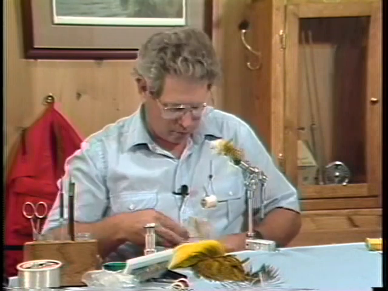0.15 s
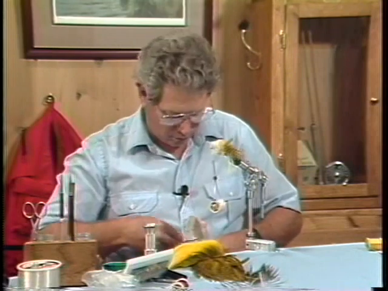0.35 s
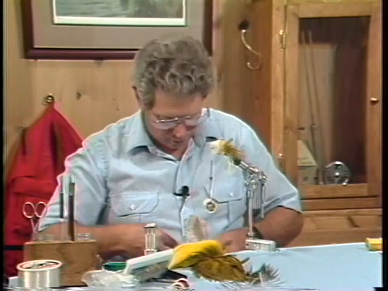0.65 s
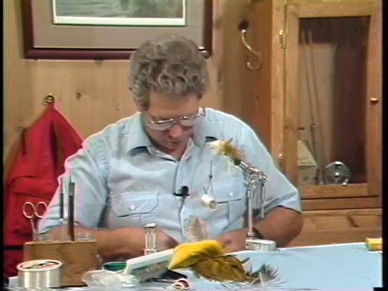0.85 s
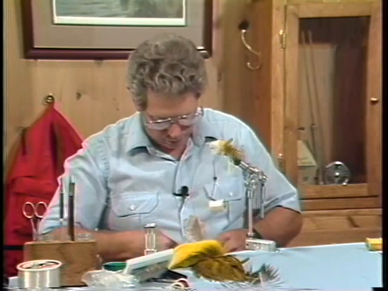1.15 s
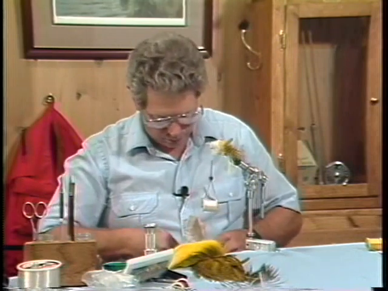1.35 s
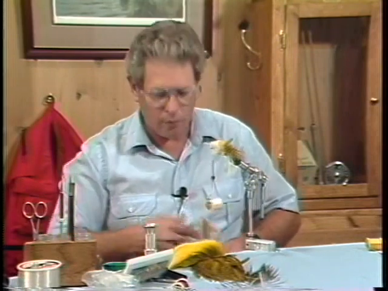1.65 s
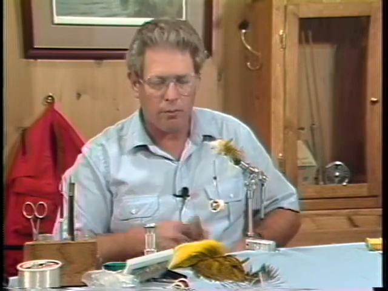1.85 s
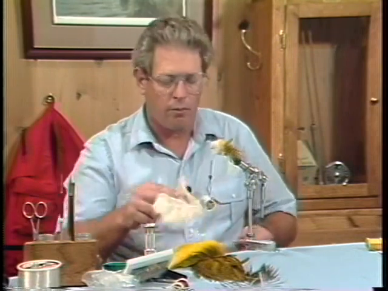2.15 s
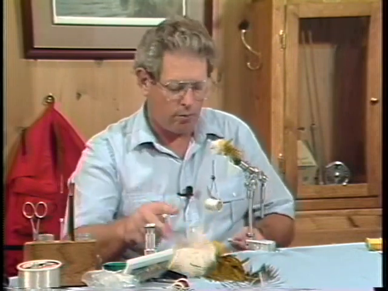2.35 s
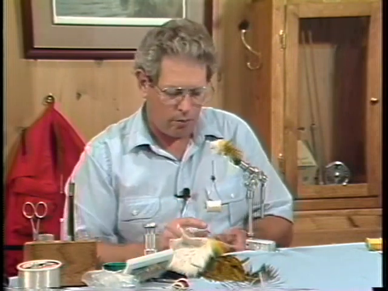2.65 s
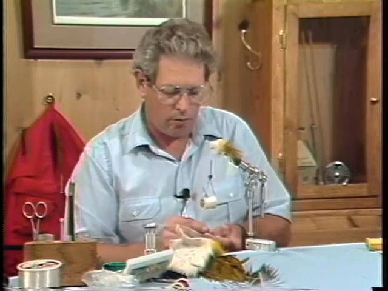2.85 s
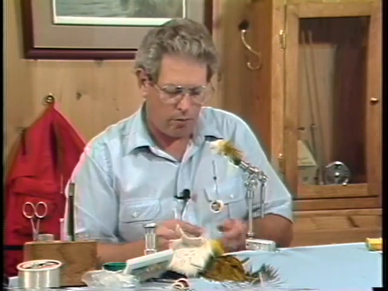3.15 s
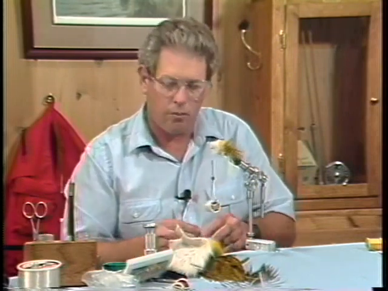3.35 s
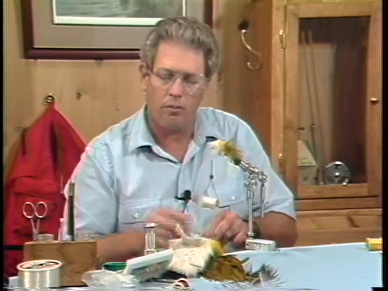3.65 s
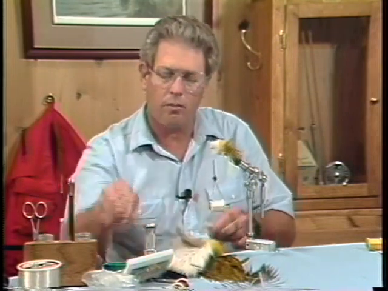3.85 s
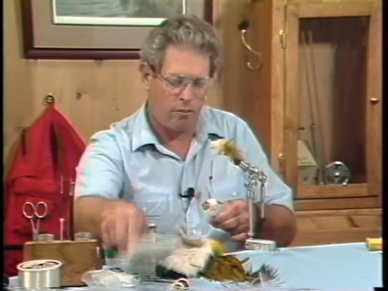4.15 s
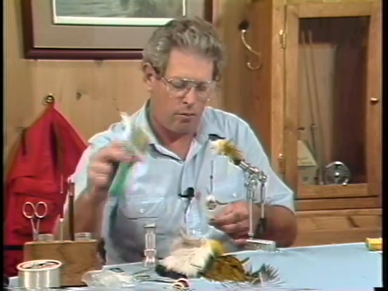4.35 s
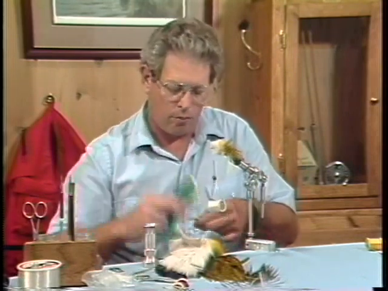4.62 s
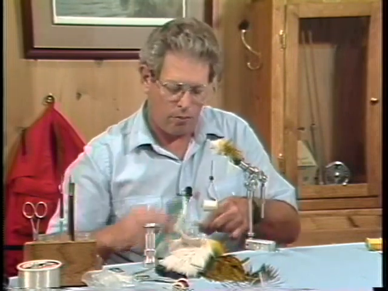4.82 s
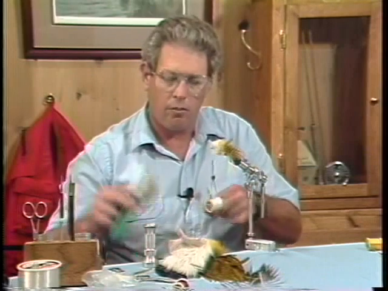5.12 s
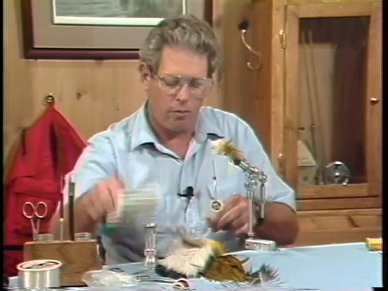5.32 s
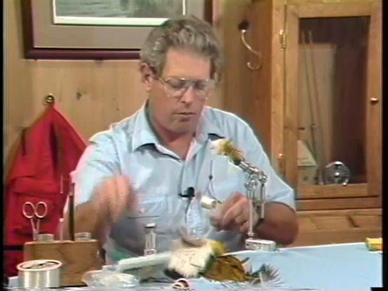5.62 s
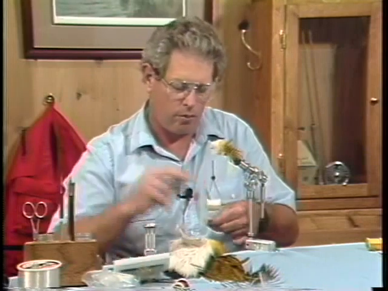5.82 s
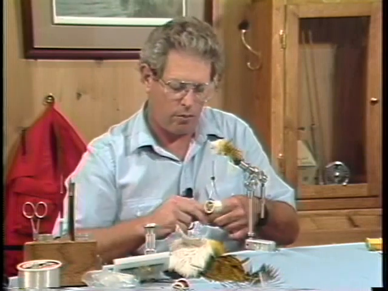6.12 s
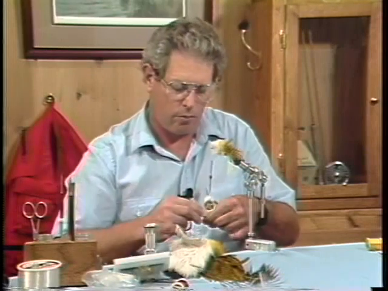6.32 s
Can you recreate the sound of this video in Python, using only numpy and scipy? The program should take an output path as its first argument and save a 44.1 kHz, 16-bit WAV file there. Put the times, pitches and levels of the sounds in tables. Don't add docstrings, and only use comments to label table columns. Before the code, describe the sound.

A clip-on microphone in a short, dry wooden room, with steady soft tape hiss and low mains hum. From 0 to 1.2 s, stiff hair rustles and crackles finely under fingers and blades, with tiny snaps and dull low bumps through desk and shirt. At 1.3 s comes one crisp, bright scissor cut, a dense crunch of hairs with a thump; at 1.75 s a lighter metallic-sounding tick and a soft bump, then a hand settles near 2.2 s. It stays nearly silent until 4.16 s, when a brush is lifted with a faint scrape and click. Short scratchy strokes rip through the hair at 4.7 s, the loudest, and 5.0 s, each ending in a plastic tick. At 5.58 s the brush drops: a sharp clack, hollow plastic ring, then bouncing, rocking rattles and sliding until 5.8 s. A faint sleeve rub follows at 6.4 s.

```python
import sys
import numpy as np
from scipy import signal
from scipy.fft import rfft, irfft
from scipy.io import wavfile
from scipy.ndimage import uniform_filter1d

SR = 44100
rng = np.random.default_rng(int(sys.argv[2]) if len(sys.argv) > 2 else 0)


def rack_gain(trim_db):
    fader = np.asarray(trim_db, float)
    return 10 ** (fader / 20)


def int16_out(signal):
    q = np.round(np.clip(np.atleast_2d(signal).T, -1, 1) * 32767)
    wavfile.write(sys.argv[1], SR, q.astype(np.int16))


N = 285632
RISE_CYCLES = 1.2


def evened(x):
    return x / np.sqrt(np.mean(x ** 2) + 1e-20)


def coloured(x, points):
    point_hz, point_db = np.transpose(points)
    hz = np.fft.rfftfreq(len(x), 1 / SR)
    gain_db = np.interp(np.log(hz + 1), np.log(point_hz + 1), point_db, -70, -70)
    return evened(irfft(rfft(x) * rack_gain(gain_db), len(x)))


def band(x, lo_hz, hi_hz):
    sos = signal.butter(2, [lo_hz, min(hi_hz, .45 * SR)], "band", fs=SR, output="sos")
    return signal.sosfilt(sos, x)


def add(mix, start_s, sound):
    part = mix[round(start_s * SR):][:len(sound)]
    part += sound[:len(part)]


def wavering(shape, smooth):
    return evened(uniform_filter1d(rng.standard_normal(shape), size=smooth))


def swells(rows, second=False):
    roundness = 1.05
    t = np.arange(0, N / SR, .0005)
    power = np.zeros(len(t))
    for peak_s, level_db, swell_s, fade_s, second_db in rows:
        away = np.where(t < peak_s, (peak_s - t) / swell_s, (t - peak_s) / fade_s)
        gain_db = level_db + second * second_db - 20 * np.minimum(away, 8) ** roundness
        power += rack_gain(gain_db) ** 2
    return np.interp(np.arange(N) / SR, t, np.sqrt(power))


def tape_and_mains():
    # hz, level_db
    hum_lines = [(60, -64), (120, -73), (180, -75), (240, -68), (420, -76), (480, -82), (540, -77),
                 (660, -86), (720, -81), (900, -88), (1200, -86)]
    # hz, density_db
    hiss_points = [(15, -10), (35, -12.5), (60, -8), (130, -12.5), (300, -18), (800, -22.5), (2000, -23.5),
                   (13500, -23.5)]
    t = np.arange(N) / SR
    waver = 1 + 0.025 * wavering((len(hum_lines), N // 50 + 1), 60).repeat(50, axis=1)[:, :N]
    hum = np.zeros(N)
    for (hz, level_db), wobble in zip(hum_lines, waver):
        hum += rack_gain(level_db + 1) * wobble * np.sin(2 * np.pi * (hz * t + rng.random()))
    return rack_gain(-60) * coloured(rng.standard_normal(N), hiss_points) + hum


def bumps():
    # peak_s, level_db, swell_s, fade_s, upper_part_relative_db
    shakes = [(.02, -60.5, .05, 0.14, 2), (.2, -45, 0.07, 0.26, -5), (.43, -47.5, 0.48, 0.62, -4),
              (.78, -63, .08, 0.11, -2), (.98, -50.5, 0.15, 0.6, -5), (1.18, -49, 0.096, 0.1, 4),
              (1.33, -48.5, 0.31, 0.3, -2.5), (1.6, -52.5, 0.44, 0.28, -2.5),
              (1.81, -52.5, 0.15, 0.46, 0.5), (2.22, -56, 0.083, 0.51, 1.5), (2.41, -69, .1, 0.14, -11),
              (4.18, -64, 0.039, 0.83, 0.5), (4.5, -54.5, 0.11, 0.33, 0.5), (4.7, -51, 0.12, 0.067, -1.5),
              (4.8, -59, 0.075, 0.91, 6.5), (5.0, -55, 0.23, 0.12, -5), (5.2, -57.5, 0.41, 0.45, -3.5),
              (5.66, -53, 0.094, 0.32, 8), (5.85, -51, 0.091, 0.27, -5.5), (6.11, -56, 0.079, 0.12, -22),
              (6.44, -51.5, 0.22, 0.034, -8.5)]
    # start_s, peak_db, first_pitch_hz, t60_s
    thumps = [
        (1.169, -37, 66.6, 0.12),
        (1.79, -26.5, 151, 0.12),
        (2.196, -29.5, 136, 0.11),
        (4.68, -37, 180, 0.19),
    ]
    # middle_s, peak_db, pitch_hz, length_s
    sways = [(.173, -37, 242, 0.0095), (.185, -49.5, 330, 0.014), (0.191, -28, 104, 0.035),
             (.222, -46, 150, .025), (.4, -45, 160, .03), (0.245, -53.5, 230, 0.022),
             (0.238, -35.5, 44.7, 0.06), (0.304, -40, 41.8, 0.066), (0.425, -42, 54.6, 0.064),
             (0.618, -39, 57, 0.084), (1.005, -57, 54.7, 0.058), (1.155, -47, 290, 0.018),
             (1.174, -40, 305, 0.022), (1.188, -45, 320, 0.019), (1.183, -46, 168, 0.027),
             (1.188, -48, 470, 0.017), (1.297, -35.5, 495, 0.0085), (1.312, -26.5, 152, 0.02),
             (1.331, -30.5, 118, 0.022), (1.768, -49, 202, 0.012), (1.774, -44, 60, 0.037),
             (1.844, -42, 70, 0.037), (2.199, -50.5, 266, 0.018), (2.281, -55, 162, 0.028),
             (2.347, -52, 150, 0.021), (1.201, -33.5, 61, 0.084), (1.347, -26, 52.3, 0.062),
             (1.517, -41.5, 57.6, 0.071), (1.819, -35, 69, 0.047), (1.869, -50, 41.7, 0.08),
             (2.219, -44.5, 64.4, 0.064), (4.17, -54, 148, .03), (4.351, -57, 293, 0.043),
             (4.47, -51.5, 340, 0.023), (4.503, -45, 53, 0.044), (4.695, -45, 166, 0.043),
             (4.99, -43.5, 90, 0.035), (4.716, -44.5, 58, 0.091), (4.879, -47, 62, 0.085),
             (4.97, -54, 45, 0.054), (5.843, -57, 52, 0.09)]
    # middle_s, peak_db, pitch_hz, length_s
    thuds = [(5.588, -34, 176, 0.014), (5.599, -35.5, 313, 0.038), (5.593, -41, 463, 0.023),
             (5.62, -36, 153, 0.059), (5.625, -43, 480, 0.034), (5.66, -44.5, 315, 0.08),
             (5.735, -52, 616, 0.017), (5.764, -53, 564, 0.031), (5.61, -48, 620, 0.018),
             (5.649, -39, 172, 0.036), (5.674, -47, 483, 0.03), (5.687, -40.5, 163.5, 0.066),
             (5.74, -45, 245, 0.033), (5.756, -47, 151, 0.043), (5.755, -48, 465, 0.038),
             (5.846, -54, 250, 0.023)]
    deep_points = [(20, -37), (38, -5.0), (58, -2.0), (85, -9.0), (130, -28)]  # hz, db
    upper_points = [(80, -15.5), (130, 3), (200, -2.0), (350, -9.5), (800, -24.0)]
    deep = coloured(rng.standard_normal(N), deep_points)
    upper = coloured(rng.standard_normal(N), upper_points)
    out = rack_gain(-2.0) * (swells(shakes) * deep + swells(shakes, second=True) * upper)

    t = np.arange(SR // 4) / SR
    rest_hz, settle_s, rise_s = 54, 0.0426, 0.0096
    for start_s, peak_db, first_hz, t60_s in thumps:
        sag_hz = rest_hz + (1.15 * first_hz - rest_hz) * np.exp(-t / settle_s)
        shape = rack_gain(peak_db - 2.0 - 60 * t / t60_s) * (1 - np.exp(-t / rise_s))
        add(out, start_s, shape * np.sin(2 * np.pi * np.cumsum(sag_hz) / SR))
        knock = evened(band(rng.standard_normal(len(t)), 190, 306))
        add(out, start_s, rack_gain(peak_db - 17.0 - 60 * t / 0.079) * knock)

    since = t - t.mean()
    for middle_s, peak_db, hz, length_s in [*sways, *thuds]:
        shape = rack_gain(peak_db - 20 * (2 * since / length_s) ** 2)
        add(out, middle_s - t.mean(), shape * np.sin(2 * np.pi * hz * since))
    return out


def crackle(per_s, spread_db, smear_s):
    size = rack_gain(spread_db * np.minimum(rng.exponential(1, N), 4)) * (rng.random(N) < per_s / SR)
    keep = np.exp(-1 / (smear_s * SR))
    return signal.lfilter([1], [1, -keep], size) * rng.standard_normal(N)


def blotched(x, patchy_db):
    z = signal.stft(x, nperseg=128, noverlap=64)[2]
    across_pitch = uniform_filter1d(rng.standard_normal(z.shape), size=4, axis=0)
    patches = uniform_filter1d(across_pitch, size=3, axis=1)
    return signal.istft(z * rack_gain(patchy_db * evened(patches)), nperseg=128, noverlap=64)[1][:N]


def hair():
    # peak_s, level_db, swell_s, fade_s, rub_relative_db
    rustles = [(.05, -68, 0.12, 0.09, 1), (.218, -58.5, 0.12, 0.13, -2), (.33, -51, 0.037, 0.13, -9),
               (.36, -54, 0.057, 0.019, -13), (.47, -54, 0.31, 0.1, -7), (.605, -56.5, 0.16, 0.16, -6),
               (.77, -66, .015, .02, -10), (.93, -62, 0.054, 0.14, -3.5), (1.005, -58.5, 0.13, 0.074, -4.5),
               (1.155, -54, 0.1, 0.12, -5.5), (1.2, -53, 0.093, .015, -9), (1.27, -57.5, 0.088, .05, -2),
               (1.33, -68, .03, .06, -12), (1.44, -52, 0.22, 0.034, -7.5), (1.55, -62.5, 0.25, 0.28, -1.5),
               (1.752, -44, 0.016, 0.11, -12.5), (1.8, -53, 0.095, 0.17, -6),
               (1.91, -60.5, 0.16, 0.36, 3.5), (2.095, -61, .04, .02, -15), (2.24, -62, 0.1, .4, -1)]
    # peak_s, level_db, swell_s, fade_s, rub_relative_db
    handlings = [
        (4.164, -57, 0.0086, 0.067, 6.5),
        (4.23, -70.5, .05, 0.94, 5.5),
        (4.456, -67.5, 0.057, 0.3, 9.5),
        (4.64, -74, .06, .06, -5),
        (5.67, -52, 0.035, 0.044, 3),
        (5.726, -50, 0.044, 0.11, -0.5),
        (5.8, -64.5, .06, .4, 3),
        (6.2, -72, .1, 0.34, -11),
        (6.375, -53, .026, 0.068, -16),
        (6.46, -70, .05, .1, 0),
    ]
    # peak_s, level_db, swell_s, fade_s, rub_relative_db
    strokes = [(1.293, -47, .005, .004, -12), (1.2965, -28.5, 0.002, 0.023, -4),
               (1.307, -23.5, 0.0055, 0.0048, -5.5), (1.312, -49, .004, 0.048, -3.5),
               (4.689, -28.5, 0.0045, 0.024, -7.5), (4.701, -21.5, 0.0058, 0.02, -15),
               (4.722, -32.5, 0.031, 0.028, -9.5), (4.745, -55.5, 0.023, 0.15, 2),
               (4.977, -32.5, 0.011, 0.033, -4.5), (4.99, -26.5, 0.02, 0.022, -3.5),
               (5.01, -40, .015, 0.022, -18), (5.03, -60.5, 0.023, 0.17, 7)]
    # hz, density_db
    fine_points = [(2500, -18.5), (5700, -10.5), (6500, -4), (7000, -4), (7600, 1), (8400, -0.5), (9400, 0),
                   (13500, -10)]
    rub_points = [(200, 4), (400, 3), (1500, -0.5), (3500, -4.5), (7000, -2.5)]
    crunch_points = [(1500, -19), (3000, -12.5), (4000, -13), (5200, -7.5), (7500, -3), (10500, -5.5),
                     (12000, -9), (13500, -13)]
    fine = coloured(blotched(crackle(per_s=5000, spread_db=2.6, smear_s=.0006), 3.5), fine_points)
    rub = coloured(crackle(per_s=4000, spread_db=2.5, smear_s=.0015), rub_points)
    crunch = coloured(blotched(crackle(per_s=14000, spread_db=2, smear_s=.0004), 3.5), crunch_points)
    moves = [*rustles, *handlings]
    handling = swells(moves) * fine + swells(moves, second=True) * rub
    cutting = rack_gain(-1.0) * swells(strokes) * crunch + rack_gain(-3.5) * swells(strokes, second=True) * rub
    return handling + cutting


def snaps(rows, low_db, t60_s, spread=0.058):
    out, t = np.zeros(N), np.arange(3000) / SR
    noise = rng.standard_normal((len(rows), 3, len(t)))
    fade_in = np.minimum(t / .0003, 1)
    ring_on = rack_gain(-34 - 60 * t / .05)
    fall = fade_in * (rack_gain(-60 * t / t60_s) + ring_on)
    for (start_s, peak_db, hz, breadth_db), (a, b, c) in zip(rows, noise):
        pitched = evened(band(a, hz * (1 - spread), hz * (1 + spread)))
        broad = rack_gain(breadth_db) * evened(band(b, 3340, 10200))
        high = fall * (pitched + broad)
        low = fall * band(c, 920, 2360)
        puff = high / abs(high).max() + rack_gain(low_db) * low / abs(low).max()
        add(out, start_s, rack_gain(peak_db - 1.0) * puff)
    return out


def slips():
    # middle_s, peak_db, pitch_hz, length_s
    slip_bursts = [(1.2981, -31, 7670, 0.0024), (1.2982, -33, 5430, 0.0038), (1.303, -26, 9300, 0.0027),
                   (1.3053, -22, 10500, 0.0042), (1.3062, -28, 6980, 0.0019), (1.3069, -22, 10420, 0.0018),
                   (1.3072, -23, 8010, 0.0016), (1.3073, -24.5, 1680, 0.0019),
                   (1.3076, -21.5, 5470, 0.0026), (1.3079, -22, 6550, 0.0041), (1.3084, -26, 10680, 0.002),
                   (4.1608, -53, 6980, 0.0106), (4.1609, -49, 4570, 0.0041), (4.1622, -53, 3470, 0.0052),
                   (4.1685, -49, 7490, 0.0045), (4.1687, -43, 2100, 0.009), (4.1696, -53, 3360, 0.0065),
                   (4.174, -42, 2250, 0.0041), (4.6887, -31, 7900, 0.0034), (4.6889, -25, 9800, 0.003),
                   (4.6939, -20, 7150, 0.0022), (4.6968, -18, 6720, 0.0023), (4.7, -10, 5840, 0.0013),
                   (4.701, -16, 7920, 0.0024), (4.7019, -25, 9040, 0.0022), (4.7026, -18, 6980, 0.0026),
                   (4.703, -27, 9820, 0.0023), (4.7036, -22, 4630, 0.0086), (4.7045, -16, 6120, 0.0019),
                   (4.706, -27, 7150, 0.0022), (4.7061, -25, 4920, 0.0117), (4.7064, -27, 9040, 0.002),
                   (4.7066, -25, 10680, 0.0023), (4.708, -28.5, 4690, 0.0141), (4.7137, -28, 5680, 0.0024),
                   (4.974, -29, 9800, 0.0033), (4.9763, -27, 8350, 0.0023), (4.981, -24, 8900, 0.0022),
                   (4.9857, -25, 8270, 0.002), (4.9871, -27.5, 5510, 0.0095), (4.988, -28, 6660, 0.003),
                   (4.9904, -31, 8790, 0.0046), (4.9905, -21.5, 5300, 0.0064), (4.991, -27, 9990, 0.0029),
                   (4.9919, -26, 8530, 0.0022), (4.9921, -25, 5530, 0.0069), (4.9928, -31, 10940, 0.0029),
                   (4.9956, -29, 10080, 0.0022), (4.995, -27, 5340, 0.0019), (4.998, -26, 8350, 0.0027)]
    # middle_s, peak_db, pitch_hz, length_s
    ticks = [(1.247, -39.5, 2000, 0.00066), (1.3506, -33, 6250, .001), (1.2015, -37, 9000, 0.00093),
             (1.2958, -29, 7000, .0005), (1.2993, -32, 3000, 0.0011), (1.762, -41, 7000, .0007),
             (4.99, -21, 6500, .0005), (4.9828, -24, 7000, .0005), (1.751, -34, 9000, .001),
             (1.7533, -27.5, 9600, .0012), (1.756, -33, 9000, .0012), (1.7655, -45, 7300, .001),
             (4.6994, -17, 2980, 0.00043), (4.729, -18, 5500, 0.00064), (4.73, -24, 2980, 0.00062),
             (5.0236, -18.5, 5800, 0.00043), (5.024, -28, 4020, 0.0005), (5.0261, -27, 2500, .001)]
    # start_s, peak_db, pitch_hz, t60_s
    pings = [(4.16, -52, 4740, 0.055), (4.16, -55, 3435, .08), (4.167, -52, 2170, .1),
             (4.168, -56, 3430, .12), (4.7315, -39, 2520, 0.063), (5.024, -37, 2520, 0.059),
             (5.0234, -38, 1740, 0.044), (5.046, -52, 1705, .08), (5.334, -62, 2520, 0.13),
             (5.598, -35, 2517, .13), (5.603, -36, 2010, 0.07), (5.629, -43, 1530, .05)]
    # start_s, peak_db, pitch_hz, t60_s
    after_ring = (5.668, -55, 1346, .4)
    longest_s = .005
    out, t = np.zeros(N), np.arange(SR // 6) / SR
    since = t[:1000] - t[500]
    for middle_s, peak_db, hz, length_s in [*slip_bursts, *ticks]:
        shape = rack_gain(peak_db - 1.0 - 20 * (2 * since / min(length_s, longest_s)) ** 2)
        add(out, middle_s - t[500], -shape * np.cos(2 * np.pi * hz * since))
    for start_s, peak_db, hz, t60_s in [*pings, after_ring]:
        shape = rack_gain(peak_db - 60 * t / t60_s) * (1 - np.exp(-hz * t / RISE_CYCLES))
        add(out, start_s, shape * np.sin(2 * np.pi * hz * t))
    return out


def swish():
    # start_s, end_s, first_hz, last_hz, level_db
    squeak = (4.45, 4.56, 6050, 5500, -70)
    start_s, end_s, first_hz, last_hz, level_db = squeak
    count, out = round((end_s - start_s) * SR), np.zeros(N)
    waver = 1 + .5 * wavering(count, 300)
    phase = 2 * np.pi * np.cumsum(np.linspace(first_hz, last_hz, count)) / SR
    add(out, start_s, rack_gain(level_db) * np.hanning(count) * waver * (np.sin(phase) + np.sin(2 * phase)))
    return out


def brush():
    # hz, level_db, t60_s
    handle_modes = [(780, -11.5, .085), (1346, -1.5, .25), (1440, -14, .08), (1534, -2, .07),
                    (1920, -17, .15), (2089, -13, .12), (2300, -12, .065), (2490, -14, .09),
                    (2525, -18, .15), (2810, -17, .12), (2870, -17, .15), (2985, -11, .11),
                    (3295, -14, .13), (3840, -26, .12)]
    # start_s, level_db
    landing = (5.581, -23.5)
    # start_s, clatter_db, thud_relative_db, thud_hz
    drops = [
        (5.581, -28, -9.5, 500),
        (5.595, -52, -5, 500),
        (5.607, -43.5, 0, 500),
        (5.625, -54, 14, 330),
        (5.654, -52, 11, 480),
        (5.699, -66, 14, 330),
        (5.677, -54, 3, 520),
        (5.73, -61, 10, 504),
        (5.749, -62, -2, 527),
        (5.8, -67.5, 12.5, 450),
    ]
    out, t = np.zeros(N), np.arange(SR // 3) / SR
    waver = 1 + 0.1 * wavering((len(handle_modes), len(t)), 250)
    touch = np.interp(t, [0, .005, .076, .09], [.2, 1, 1, .15])
    ring = np.zeros(len(t))
    for (hz, level_db, t60_s), wobble in zip(handle_modes, waver):
        shape = rack_gain(level_db - 60 * t / t60_s) * (1 - np.exp(-hz * t / RISE_CYCLES))
        ring += wobble * touch * shape * np.sin(2 * np.pi * (hz * t + rng.random()))
    add(out, landing[0], rack_gain(landing[1]) * ring)

    noise = rng.standard_normal((len(drops), 2, len(t)))
    clatter_fall = rack_gain(-60 * t / 0.064) + rack_gain(-13.5 - 60 * t / 0.27)
    for (start_s, clatter_db, thud_db, thud_hz), (a, b) in zip(drops, noise):
        clatter = clatter_fall * evened(band(band(a, 600, 9000), 500, 10000))
        thud_shape = rack_gain(thud_db - 60 * t / 0.14) * np.minimum(t / 0.0091, 1)
        thud = thud_shape * evened(band(b, thud_hz * 0.5, thud_hz * 1.4))
        add(out, start_s, rack_gain(clatter_db) * (clatter + thud))
    return out


def scene():
    # start_s, peak_db, pitch_hz, breadth_db
    hair_snaps = [(.3255, -32, 9910, 8), (.3336, -33, 7700, 2), (.3472, -32, 9860, 2),
                  (.3591, -35, 7500, -8), (.3807, -50, 8010, -6), (.6051, -39, 9800, -17),
                  (.7697, -44, 9650, -6), (.9133, -44.5, 8960, -8), (1.108, -42, 7500, -3),
                  (1.1497, -35, 9400, -5), (1.1587, -31, 10000, -2), (1.174, -30, 9300, -9),
                  (1.188, -34, 7000, -5), (1.2012, -31.5, 9050, -10), (1.2396, -34, 9200, -15),
                  (1.2467, -27.5, 6940, 0), (1.2868, -26, 7700, 10), (1.2997, -36, 9000, -13),
                  (1.3066, -10.5, 10800, 5), (1.35, -27.5, 6050, -6), (1.405, -39, 7670, -2),
                  (1.543, -44, 6680, -8), (1.774, -35, 7900, -14), (1.897, -42, 10300, -15),
                  (1.9135, -53, 7500, -2), (.3405, -40, 7600, -10), (.3665, -41, 10300, -8),
                  (.4, -44, 9500, -2), (.4895, -45, 10500, -3), (.574, -46, 7800, -12),
                  (1.299, -37, 3000, -5), (1.253, -44, 9000, 0), (1.7946, -43, 8440, 0)]
    # start_s, peak_db, pitch_hz, breadth_db
    bristle_snaps = [(4.1598, -43, 7300, -4), (4.6874, -22.5, 9500, -6), (4.6993, -19.5, 5750, 3),
                     (4.7055, -21, 10800, -1), (4.7298, -25, 4360, -5.5), (4.8323, -45, 9400, -2),
                     (5.001, -24, 8000, 0), (5.0238, -29, 6500, -10), (5.069, -47, 8100, 3),
                     (5.3337, -45, 7410, -2), (5.5808, -20, 7100, -11), (5.587, -22, 8200, -12),
                     (5.7095, -41, 4080, -10), (5.733, -42, 4300, -10), (5.754, -41, 9500, -8),
                     (5.6555, -36, 10400, -10), (5.658, -36, 7000, -8), (5.6668, -32, 10000, -5),
                     (5.671, -37, 10200, -12), (5.6772, -32, 6930, 2), (5.7243, -36, 10590, 4)]
    # start_s, peak_db, pitch_hz, breadth_db
    handle_knocks = [(4.163, -54, 5000, -3), (4.18, -52, 2300, -10), (4.195, -55, 2200, -8),
                     (4.7314, -29, 2510, -10), (5.024, -33, 2280, -12), (5.032, -43, 2400, -20),
                     (5.048, -45, 1760, -16), (5.587, -35, 3020, -20), (5.6, -33, 2390, -22),
                     (5.607, -36, 3170, -20), (1.792, -47, 1100, -20), (1.795, -46.5, 3500, -20)]
    sharp = snaps(hair_snaps, low_db=-17.5, t60_s=0.0036)
    sharp += snaps(bristle_snaps, low_db=-6, t60_s=0.0077)
    sharp += snaps(handle_knocks, low_db=-24, t60_s=0.042, spread=0.2)
    sharp += slips() + brush()
    t = np.arange(SR // 6) / SR
    tail = band(rng.standard_normal(len(t)), 820, 4550) * rack_gain(-60 * t / 0.22) * (t > .004)
    room = rack_gain(-20) * signal.oaconvolve(sharp, tail / np.linalg.norm(tail))[:N]
    mono = tape_and_mains() + bumps() + hair() + sharp + room + swish()
    return np.array([mono, mono])


def roll_off(x):
    return signal.sosfilt(signal.butter(12, 14540, fs=SR, output="sos"), x)


def record(dry):
    # low_hz, high_hz, level_db
    apart_bands = [(2000, 6400, -33), (6500, 7200, -14.5), (9000, 9700, -15), (11750, 13700, -13.5)]
    held = .42 * np.tanh(dry / .42)
    flutter = .03 * np.tanh(held[0] / .03) * wavering(N, 60)
    on = wavering((len(apart_bands), N // 1024 + 1), 2).repeat(1024, axis=1)[:, :N] > -.5
    apart = np.zeros(N)
    for (lo_hz, hi_hz, level_db), gate in zip(apart_bands, on):
        apart += rack_gain(level_db) * gate * band(band(flutter, lo_hz, hi_hz), lo_hz, hi_hz)
    edge = signal.firwin(151, 13840, window=("kaiser", 7), fs=SR)
    tracks = signal.oaconvolve(held + apart * [[1], [-1]], edge[None], "same")
    return roll_off(tracks)


dry = scene()
out = record(dry)
int16_out(out)
```